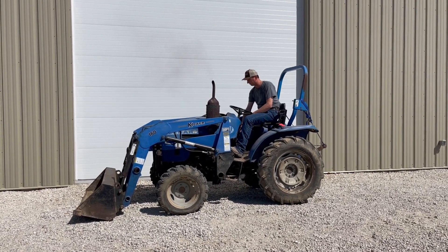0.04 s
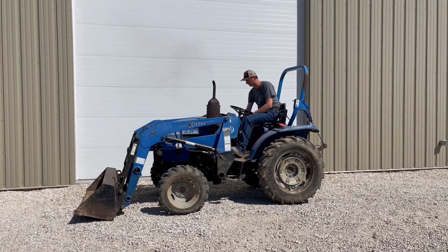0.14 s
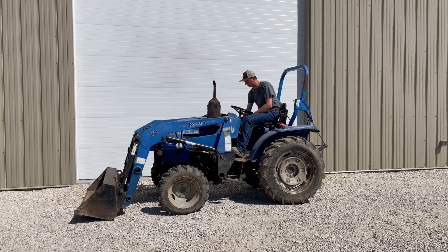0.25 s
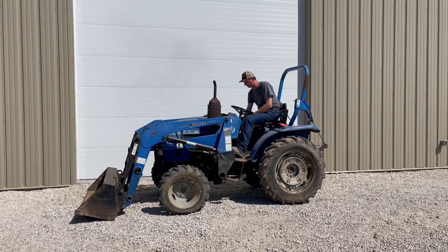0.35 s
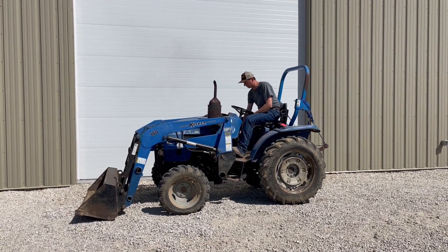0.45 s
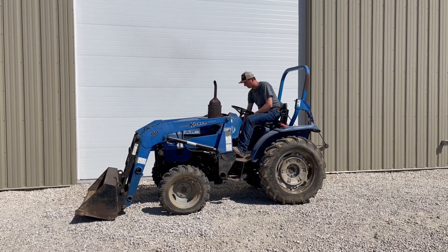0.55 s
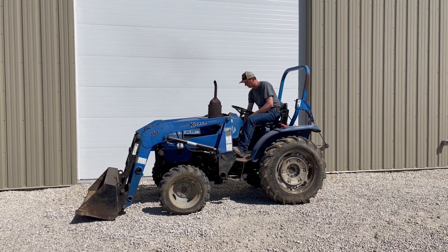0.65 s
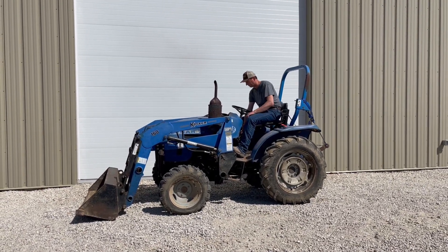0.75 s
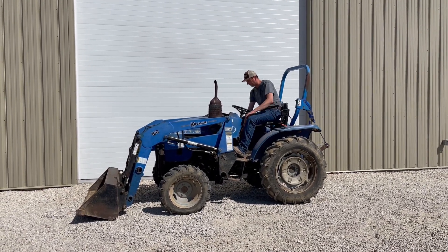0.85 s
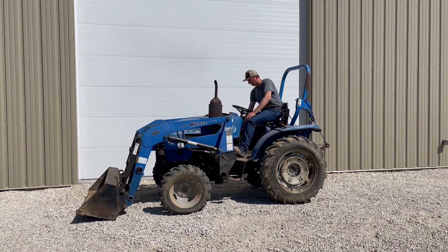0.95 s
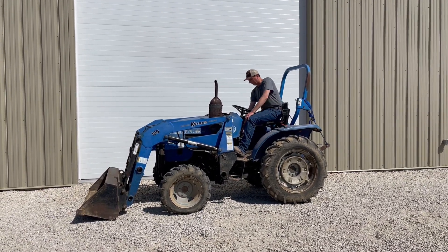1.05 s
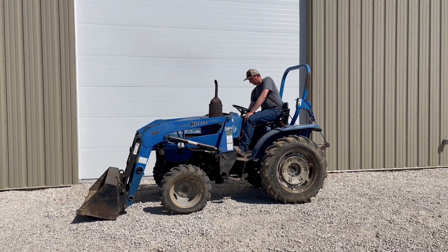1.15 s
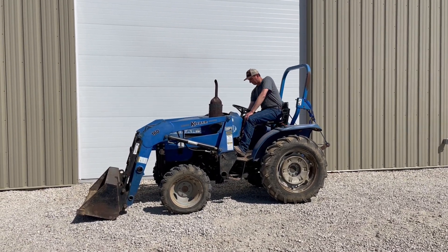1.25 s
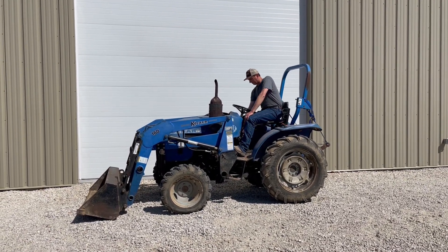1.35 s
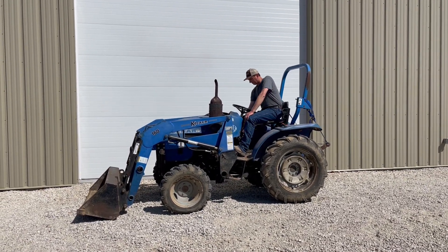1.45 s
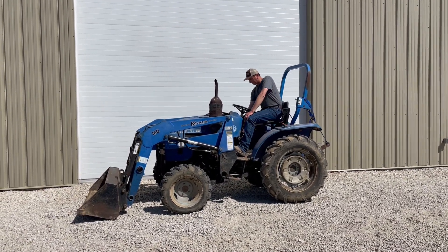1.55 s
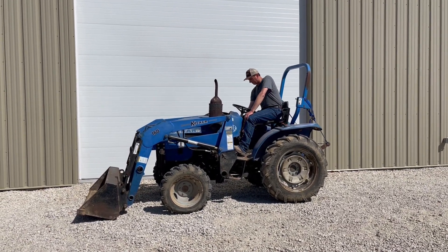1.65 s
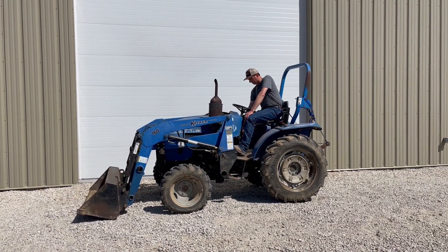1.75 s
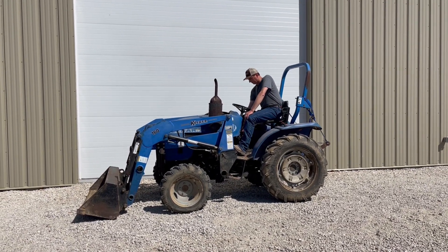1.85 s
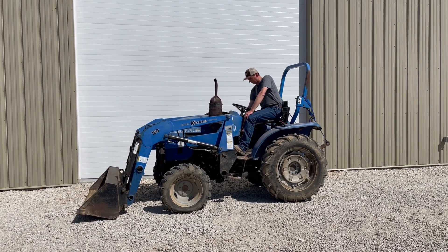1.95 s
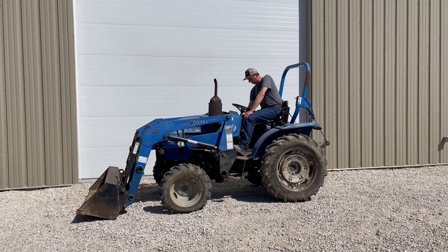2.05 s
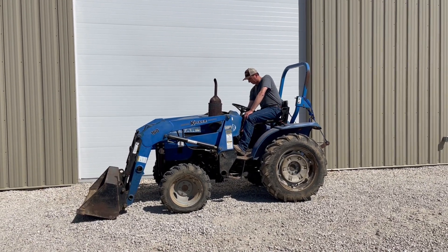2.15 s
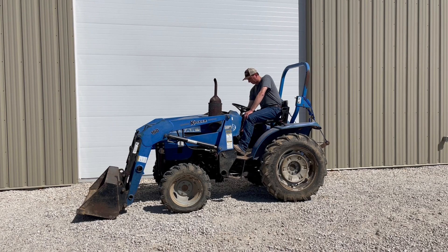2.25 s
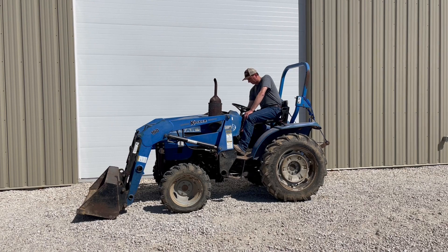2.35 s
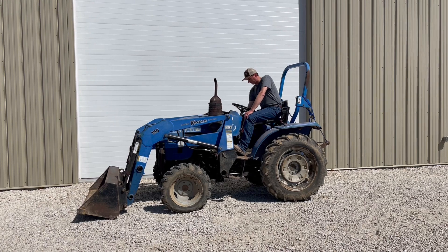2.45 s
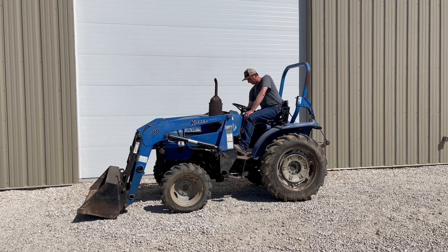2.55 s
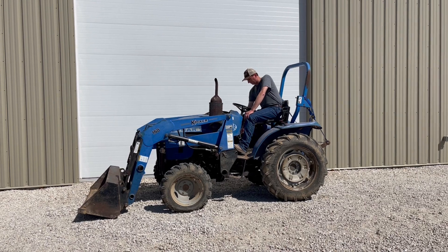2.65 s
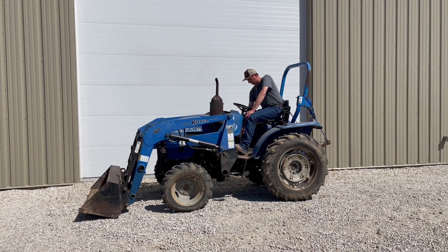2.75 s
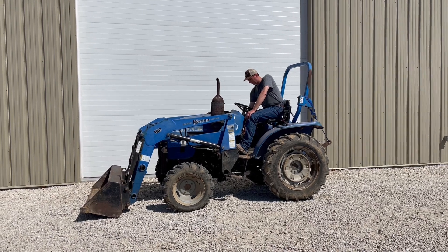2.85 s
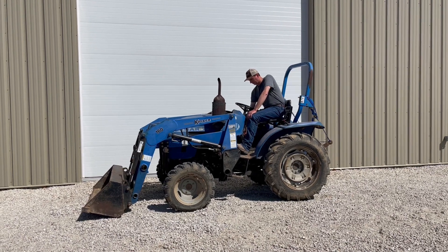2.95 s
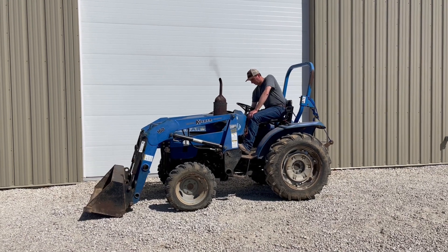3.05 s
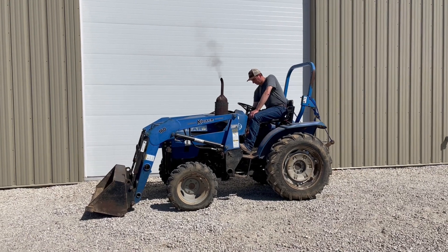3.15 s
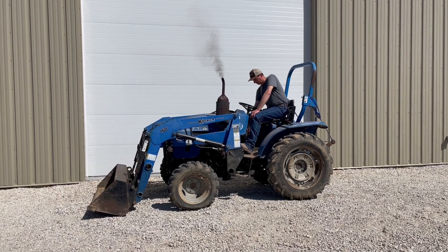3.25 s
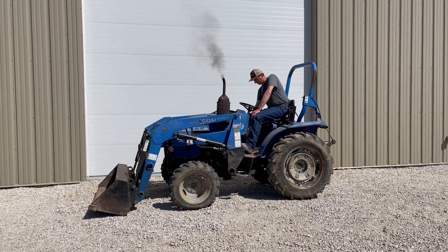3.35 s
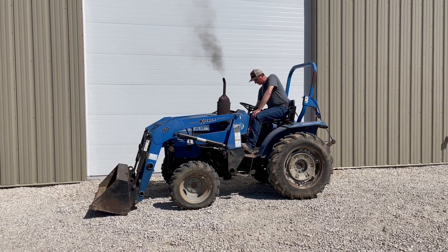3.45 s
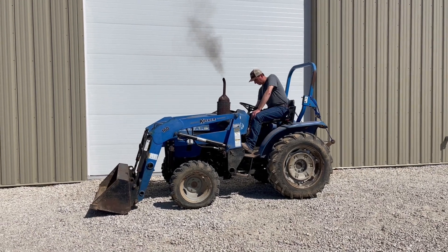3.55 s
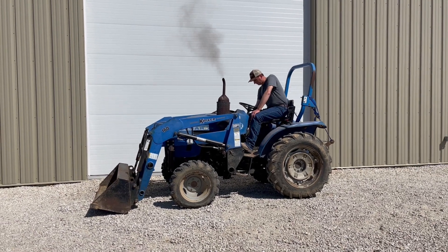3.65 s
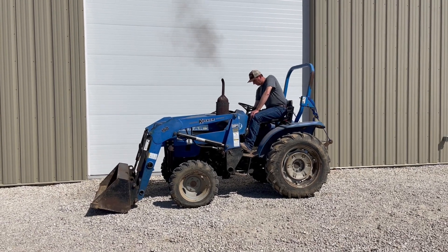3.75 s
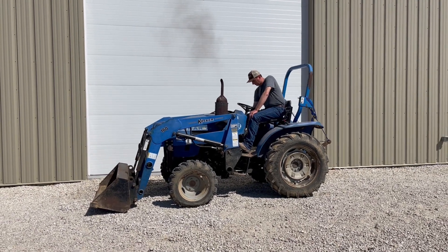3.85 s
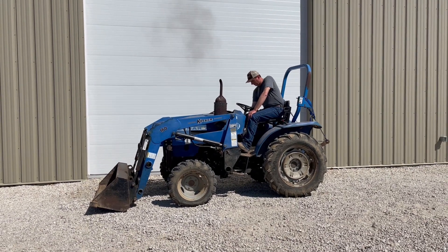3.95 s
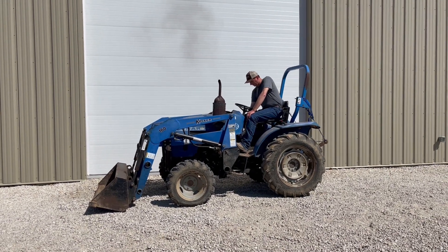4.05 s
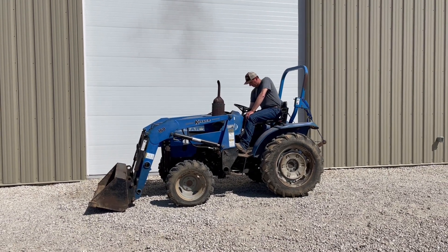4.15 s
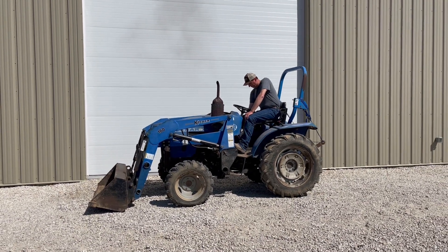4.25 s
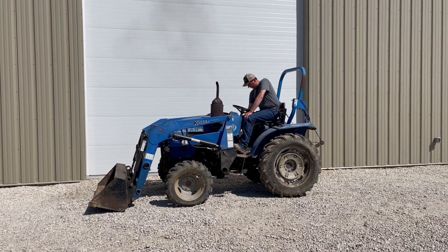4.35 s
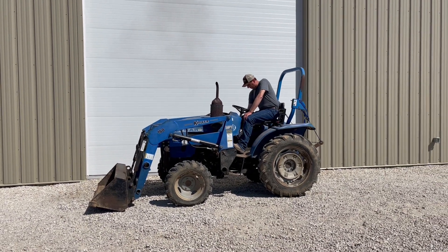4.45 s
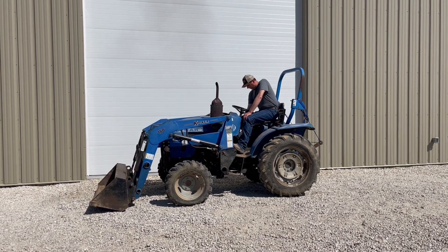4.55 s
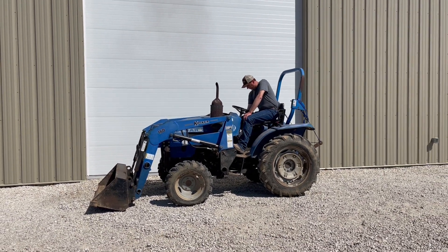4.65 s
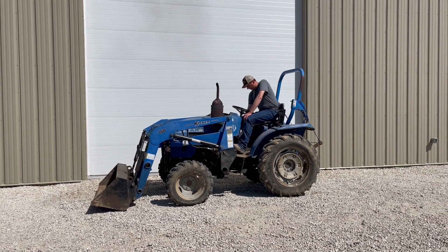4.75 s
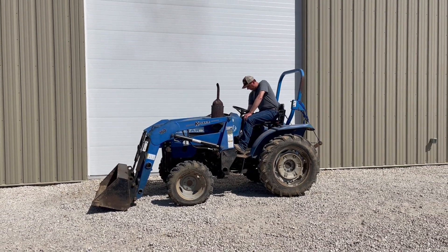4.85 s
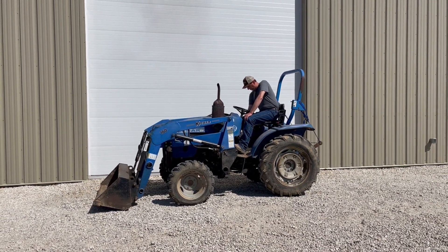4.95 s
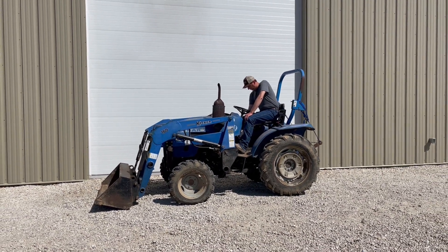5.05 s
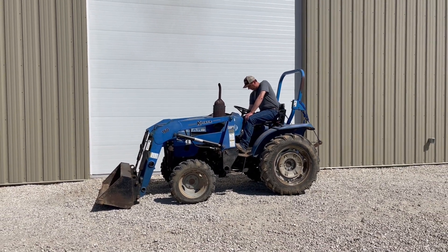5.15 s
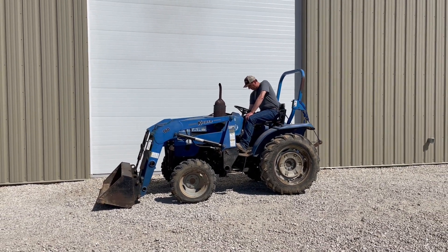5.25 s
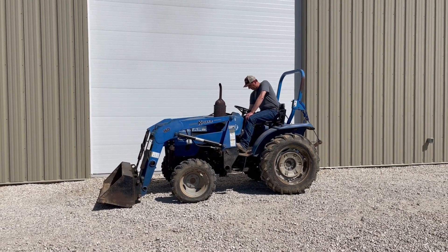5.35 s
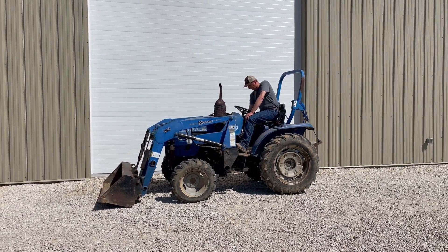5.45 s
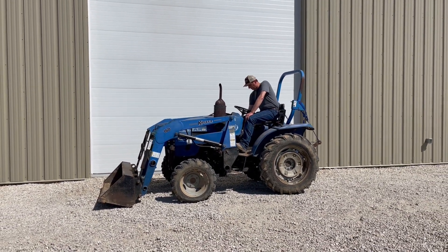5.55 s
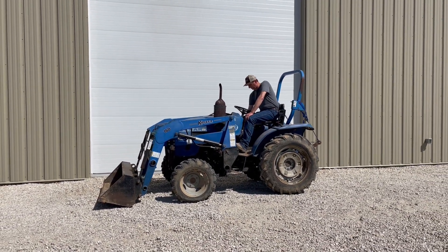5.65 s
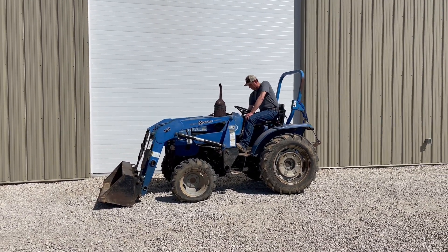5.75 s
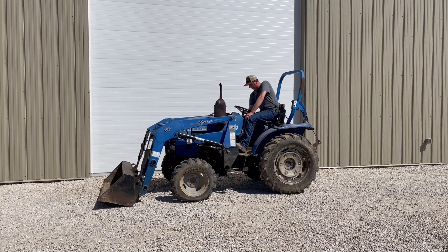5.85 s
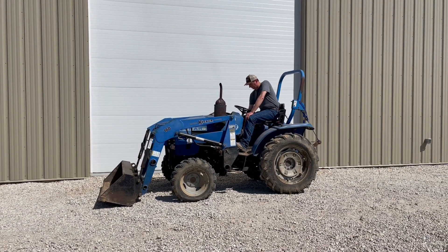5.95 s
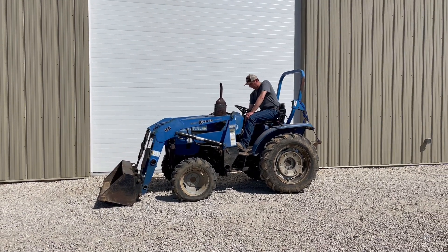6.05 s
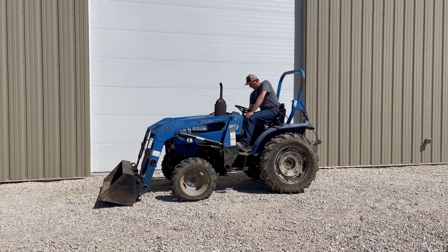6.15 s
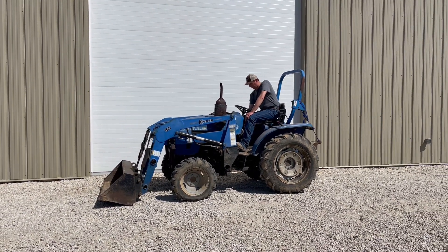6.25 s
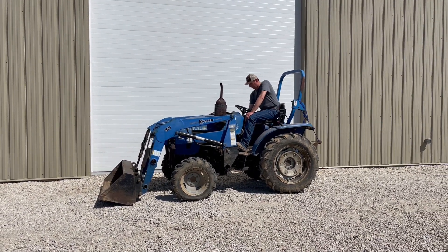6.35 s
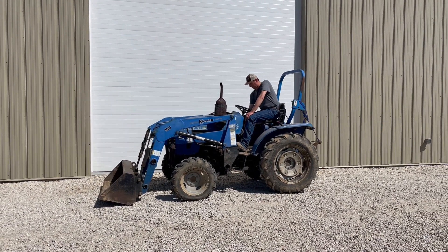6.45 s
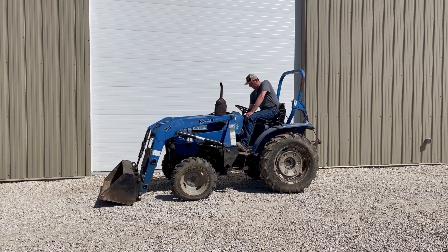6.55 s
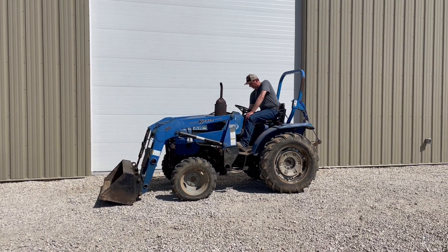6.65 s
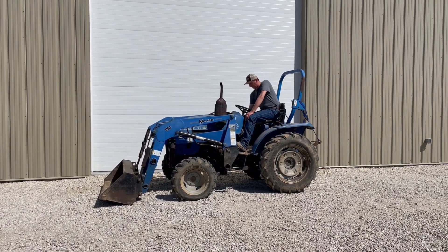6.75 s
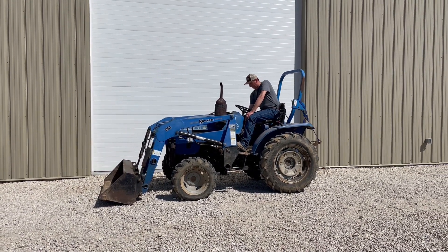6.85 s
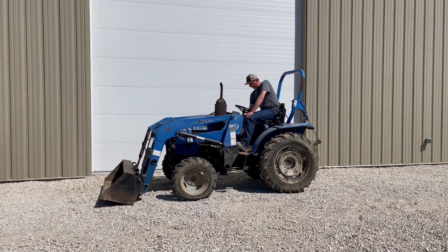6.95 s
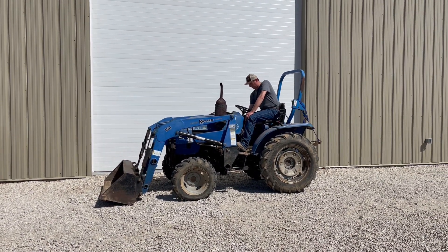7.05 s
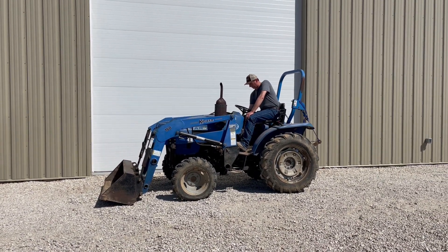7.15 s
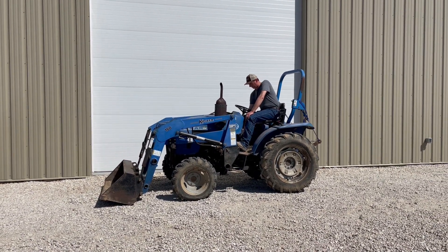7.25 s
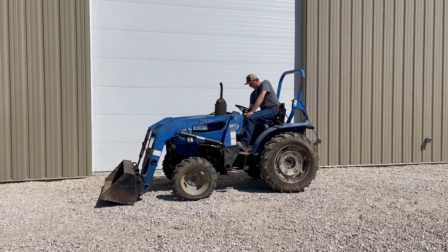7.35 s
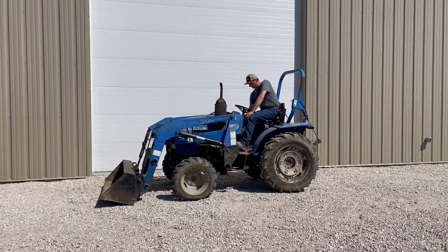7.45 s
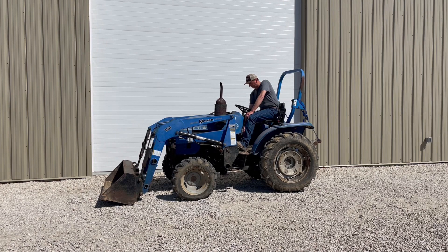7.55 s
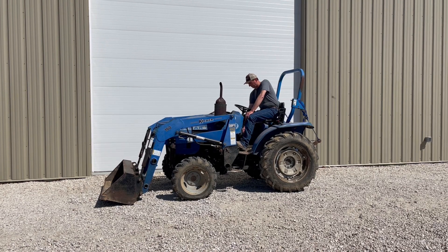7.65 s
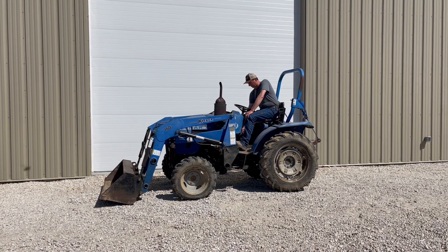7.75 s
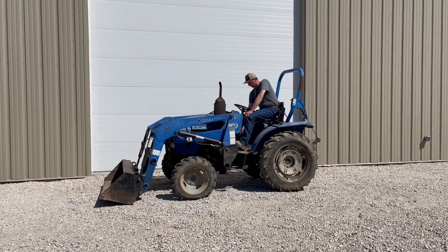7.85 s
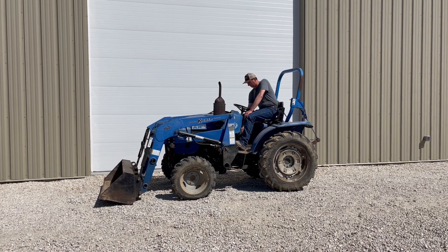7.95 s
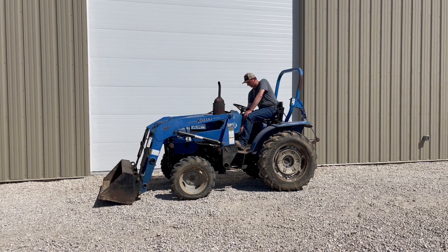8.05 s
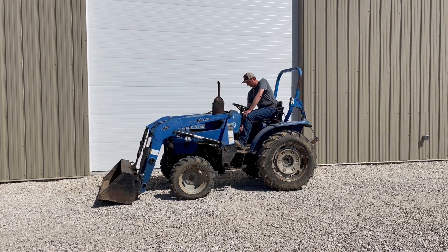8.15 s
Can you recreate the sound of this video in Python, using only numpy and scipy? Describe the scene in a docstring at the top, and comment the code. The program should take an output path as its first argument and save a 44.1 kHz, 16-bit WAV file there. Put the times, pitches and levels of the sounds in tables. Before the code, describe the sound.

Outdoor stereo sound of a compact tractor engine beside a ribbed steel building. First a quiet clattery diesel idle with dry knocks, loose cover rattle and sharp injector ticks. Then a quick rev with sputtering gas bursts to a faster chug, a second pull into a deep loud drone, and a smaller third rise to a fast hum, held to the end. Knocks blur together as whine and air rush grow.

```python
"""A compact tractor's three-cylinder diesel idles on gravel by a steel shed: muffler puffs, knocks, ticking injectors.
Each firing rings muffler and tailpipe and knocks on the block; covers rattle and valve gear clatters in between.
The first of three throttle pulls makes the exhaust spit in bright bursts of noise; each pull settles at a held speed.
With speed, gear whine climbs in step with the crank and a rush of gas and fan air covers the injector ticks.
Throughout, the shed wall and gravel scatter the treble back to a pair of close microphone ports."""
import sys
import numpy as np
from scipy import signal
from scipy.fft import rfft, irfft, next_fast_len
from scipy.io import wavfile
from scipy.ndimage import uniform_filter1d

SR = 44100
rng = np.random.default_rng(int(sys.argv[2]) if len(sys.argv) > 2 else 0)


def wrap_up_sound(samples):
    """Save the sound to the file named by the first command line argument, as 16-bit audio."""
    columns = np.atleast_2d(samples).T
    # keep every value between -1 and 1, then stretch to whole-number steps
    tamed = np.clip(columns, -1, 1)
    steps = np.round(tamed * 32767).astype(np.int16)
    wavfile.write(sys.argv[1], SR, steps)


N = 361619

# Engine speed: idle, then three pulls on the throttle. Each row: time in seconds, speed in firings per second.
ENGINE_SPEED = [(0, 15.231), (.554, 15.0), (2.18, 15.028), (2.669, 15.366), (3.282, 27.754),
                (3.835, 27.294), (4.508, 38.453), (4.754, 40.895), (5.586, 41.016), (6.002, 47.867),
                (6.387, 48.702), (7.082, 47.569), (8.2, 47.808)]
# The four held speeds, in firings per second.
HELD_SPEEDS = (15, 27, 41, 48)
# Level of each part by speed. Each row: speed in firings per second, then muffler boom, pipe bark,
# shell drone, block and hiss in dB.
PART_LEVELS = [(15.3, -28, -32.5, -39.5, -36, -48.5), (28, -27, -22.5, -33.5, -28.5, -41.5),
               (40.4, -19.5, -19.5, -30, -22.5, -38), (45, -22.5, -21.5, -33, -22, -36.5)]
# What full fuel adds to each part. Each row: speed in firings per second, then muffler boom, pipe bark,
# shell drone, block and hiss in dB.
FULL_FUEL_BOOST = [(15, 7, -0.5, -0.2, 1.9, -1), (33, 7.5, -1, -1.5, 1.5, 7.5),
                   (48.3, 3, 1.5, 3.5, 1.5, 5.5)]
# The governor gives full fuel at this acceleration (firings per s, per s); fuel lags and is smoothed.
FULL_FUEL_ACCELERATION, FUEL_LAG_S, FUEL_SMOOTHING_S = 24.3, 0.042, 0.14

# Exhaust puff of each cylinder. Each row: crank position in firings, boom in dB, bark at idle in dB,
# bark at full speed in dB.
CYLINDER_PUFFS = [(-.57, 0, 0, -4), (.43, -.6, -7.5, -5), (1.43, -1.2, -8.5, 0)]
# Sine throb at the firing rate. Each row: speed in firings per second, rms level in dB ahead of the yard.
FIRING_THROB = [(15, -82), (27, -59), (41, -37), (48, -33.5)]
# Responses of muffler, tailpipe and muffler shell. Each row: frequency in Hz, gain in dB.
MUFFLER_RESPONSE = [(25, -52), (45, 10.5), (60, 23.5), (77, 24.5), (92, 25.5), (107, 1.5), (125, 20.5),
                    (170, -21), (400, -33)]
PIPE_RESPONSE = [(60, -60.5), (110, -6), (128, -4), (146, -5), (165, 1), (190, -5.5), (207, 0), (245, -5.5),
                 (287, -1), (325, -17.5), (450, -31.5), (1200, -87)]
SHELL_RESPONSE = [(200, -35), (340, -7), (450, -7), (520, -8), (620, 0.5), (760, -8.5), (900, -6.5),
                  (1100, -7.5), (2000, -40)]
# Sharp resonances of tailpipe and silencer, which sing when a firing harmonic passes.
# Each row: frequency in Hz, width in Hz, gain in dB.
PIPE_RESONANCES = [(167.6, 1.6, -21), (210.5, 1.4, -1), (284.46, 17.3, 3.5), (216.3, 13, -5)]
SHELL_RESONANCES = [(384.7, 2.5, -2.5), (410, 3.4, -0.5), (470.3, 3.6, 3.5), (582, 4.2, 3), (626, 14, 1),
                    (658, 5.3, 1), (741.3, 19, 1)]

# Combustion knocks and piston slaps in one engine cycle. Each row: crank position at idle in firings,
# position at full speed in firings, scatter in dB, then relative level in dB at each of the four held speeds.
KNOCKS_AND_SLAPS = [(-.16, -.28, 1, .5, 1.5, 0, -1), (-.1, -.16, 1, -14, -16, -11, -4),
                    (-.07, -.04, 1, -1.5, -.5, -2.5, -1), (.3, .3, 1.5, -14, -14, -15, -10),
                    (.845, .76, 1.2, -6, -8.5, -7, -8), (.93, .88, 1.2, -6.5, -8.5, -5.5, 0),
                    (1.15, 1.2, 1.5, -20, -14, -8, -16), (1.835, 1.85, 1, -3.5, -6, -1, 0),
                    (1.945, 2.03, 1.2, -8.5, -9, -4.5, -9)]
# Firings that knock harder or softer than usual. Each row: time in seconds, level change in dB.
UNUSUAL_FIRINGS = [(.62, -6), (.885, -5), (.955, 2.5), (1.29, 3), (1.49, 2.5), (1.885, 4), (2.02, -4),
                   (2.485, -3), (2.615, 3), (2.745, 3), (3.045, -3), (3.17, 3), (3.21, 3.5), (3.283, 1.5),
                   (3.32, 2.5), (3.39, 1), (3.935, .5), (4.036, 2), (3.572, 5.5), (3.61, -4), (3.72, 2),
                   (3.83, 2), (4.223, 2), (4.308, -3), (5.265, 1.5), (5.725, 1.5), (7.475, 2.5),
                   (7.572, 1.5), (7.658, 3.5), (7.865, 2.5), (8.182, 3)]
# Other firings scatter in strength (dB); each shares its blow among the modes anew (0-1).
BURN_SCATTER_DB, STROKE_VARIETY = .6, .3
# A knock spreads through the iron, cracks, and leaves the castings ringing over a dense tail.
KNOCK_SPREAD_S, CRACK_T60_S, RING_DB = .0008, .023, 1
CRACK_HZ, CRACK_WIDTH_HZ = 2200, 2300
TAIL_HZ, TAIL_WIDTH_HZ, TAIL_T60_S, TAIL_DB = 2000, 3000, .28, -4.5
# Ringing castings and covers. Each row: frequency in Hz, width in Hz, gain at idle in dB, gain at speed in dB,
# both ahead of RING_DB.
CASTING_MODES = [(1258, 35, -4, 8), (1340, 35, 4, -6), (1455, 40, 9, 2), (1560, 45, 1, 5), (1760, 40, 0, 3),
                 (1955, 50, -8, 5), (2100, 30, 8, 2), (2172, 30, 1, 3), (2305, 60, 3, 4), (2465, 45, 0, 8),
                 (2620, 50, 4, -4), (2745, 45, 8, 1), (2944, 35, -8, 9), (3330, 80, 3, 1),
                 (4210, 100, 7, 8), (6600, 130, 3, 7)]
# Loose covers rattle after each knock.
RATTLE_PER_S, RATTLE_SCATTER_DB, RATTLE_RISE_S, RATTLE_T60_S = 190, 1.5, .003, .24
RATTLE_HZ, RATTLE_WIDTH_HZ, RATTLE_RING_T60_S, RATTLE_DB = 2400, 1100, .02, 2.5
# Clatter between the knocks. Each row: speed in firings per second, relative level in dB.
CLATTER_LEVEL = [(15, -7.5), (27, -5), (41, -6), (48, -7.5)]
# Tone of the whole block. Each row: frequency in Hz, gain in dB.
BLOCK_RESPONSE = [(150, -33), (290, 0.5), (400, 2), (650, 4.5), (1000, -3.5), (1450, -4.5), (1850, -0.5),
                  (2150, -2.5), (2480, -2), (2800, -5), (3100, -6.5), (3500, -16), (3850, -17.5),
                  (4350, -15), (5400, -16), (8000, -27), (12500, -17)]

# Injector ticks. Each row: crank position in firings, relative level in dB, ring of the steel lines in dB.
INJECTOR_TICKS = [(-.16, 4, -4), (.22, 1.5, -4), (.34, 2.5, -4), (.845, 5, -4), (1.84, 7.5, 1),
                  (2.39, 0, -4)]
# Ringing injector lines. Each row: frequency in Hz, width in Hz, gain in dB.
INJECTOR_LINES = [(4050, 34, -29), (5440, 57, 15.5), (6100, 370, 13.5), (6800, 160, 20), (7470, 160, 15),
                  (9200, 770, 11), (11270, 260, 2)]
TICK_RISE_S, TICK_T60_S = .0009, .13
# Tone of ticks and rushing air. Each row: frequency in Hz, gain in dB.
HISS_RESPONSE = [(1500, -6.5), (3200, 13.5), (3850, 14), (4400, 12.5), (5400, 8), (6600, 3.5), (7200, 2.5),
                 (8500, 7), (11600, 6), (13000, -51)]

# Whine of timing gears and pump drive. Each row: tooth meshes per firing, level at top speed in dB
# ahead of GEAR_DB, growth in dB per doubling of speed.
GEAR_WHINES = [(18.67, -43.5, 19), (23.75, -46, 30), (26.33, -46, 30), (52, -40, 30), (87.42, -52, 30)]
GEAR_DB, GEAR_ROUGHNESS, FLUTTER_HZ_PER_MESH = 4, .7, .6

# Exhaust spits. Each row: start in seconds, level in dB ahead of the rise and fall of its envelope.
EXHAUST_SPITS = [(2.785, -29.5), (2.841, -27), (2.941, -22.5), (2.989, -21), (3.036, -27), (3.076, -19.5),
                 (3.119, -23), (3.161, -27), (3.197, -25), (3.236, -33)]
# Lower and upper edge of the spits' band, in Hz.
SPIT_EDGES_HZ = (710, 12200)
SPIT_GRIT_DB, SPIT_GRAIN_S = 3.2, .0012

# Microphone ports. Each row: frequency in Hz, left minus right in dB, phase by which left leads in radians.
PORT_DIFFERENCES = [(60, -2.2, -0.24), (200, -3, -0.12), (600, -3, -0.15), (1250, -3.7, -0.062),
                    (1810, -3.5, -0.9), (2190, -4, 0.7), (2570, -2.2, 0.72), (2870, 0, 1.59),
                    (4540, 2.2, 0.84), (5500, 0.6, 1.03), (7300, 3.5, 1.2), (8200, 0.1, -0.5),
                    (9830, 0, -2.7), (11300, 0, .75)]


def exhaust(crank, speed, boom_db, bark_db, drone_db):
    """Puffs ring the muffler, the tailpipe and the muffler's shell; turbulence rides on each."""
    position, cylinder_db, idle_db, fast_db = np.transpose(CYLINDER_PUFFS)
    puffs = np.array([strikes(crank, p, scatter_db=.6, jitter_s=.00004) for p in position])
    gas = even(rng.standard_normal(N) * swell(crank, position=0.15, sharpness=0.24), crank)
    # off idle the rising piston pushes out a second puff, half a firing after the blowdown
    push = even(sum(strikes(crank, p + .5, scatter_db=1.5, jitter_s=.00004) for p in position), crank)

    boom = even(from_db(cylinder_db) @ puffs, crank)
    boom = boom + np.interp(speed, [16, 25, 41], [0, .6, .45]) * push
    gas_in_muffler = from_db(np.interp(speed, [15, 41], [-13, -16])) * gas

    # the loudest bark passes from the first cylinder at idle to the third at full speed
    shift = np.interp(speed, [16, 27, 43, 48], [0, .45, .6, 1])
    puff_db = idle_db[:, None] + np.outer(fast_db - idle_db, shift)
    bark = even((from_db(puff_db) * puffs).sum(0), crank)
    bark = bark + np.interp(speed, [20, 27, 34], [0, .6, .1]) * push
    # slow puffs are blunter, so the pipe is duller at idle
    blunt = signal.sosfilt(signal.butter(2, 175, fs=SR, output="sos"), bark)
    sharp = signal.sosfilt(signal.butter(2, 420, fs=SR, output="sos"), bark)
    bark = blunt + np.interp(speed, [27, 42], [0, 1]) * (sharp - blunt)
    gas_in_pipe = from_db(np.interp(speed, [15, 27], [-11, -13])) * gas

    pipe = colour(bark + gas_in_pipe, PIPE_RESPONSE)
    pipe += from_db(-2.5) * modes(bark, PIPE_RESONANCES)
    # at idle the pipe's first resonance dominates
    first_resonance = resonance(pipe, hz=164, width_hz=36)
    pipe += np.interp(speed, [16, 22], [.95, 0]) * (first_resonance - pipe)
    muffler = colour(boom + gas_in_muffler, MUFFLER_RESPONSE)
    out = from_db(boom_db) * even(muffler, crank) + from_db(bark_db) * even(pipe, crank)
    # the chambers hold each puff back and round its attack (an all-pass)
    out = out - 2 * resonance(out, hz=76.0, width_hz=110)

    singing = even(modes(puffs.sum(0), SHELL_RESONANCES), crank)
    singing = singing * from_db(np.interp(speed, [15, 40], [-5, 4]))
    shell_gas = even(colour(gas, SHELL_RESPONSE), crank)
    out += from_db(drone_db) * even(singing + shell_gas, crank)
    throb = np.sqrt(2) * np.cos(2 * np.pi * (crank - .15))
    return out + from_db(at_hz(FIRING_THROB, speed)) * throb


def block(crank, speed):
    """Knocks crack, ring the castings in a new mix and rattle the covers; valve gear clatters between."""
    trains = knock_clicks(crank, speed)
    clatter_db, = by_speed(CLATTER_LEVEL, speed)
    clatter = from_db(clatter_db) * (valve_gear(crank) + from_db(-6) * rng.standard_normal(N))
    chatter = rattle(trains) * from_db(np.interp(speed, [15, 44], [0, -7]))
    out = clatter + from_db(RATTLE_DB) * resonance(chatter, RATTLE_HZ, RATTLE_WIDTH_HZ)
    for clicks in trains:
        iron, stray = crack(), crack()
        iron = iron + from_db(TAIL_DB) * resonance(dying_noise(TAIL_T60_S), TAIL_HZ, TAIL_WIDTH_HZ)
        varied_clicks = clicks * rng.standard_normal(N)
        out = out + signal.oaconvolve(clicks, iron)[:N]
        out = out + signal.oaconvolve(varied_clicks, STROKE_VARIETY * stray)[:N]
    throttle = np.interp(speed, [15, 44], [0, 1])
    for hz, width_hz, idle_db, fast_db in CASTING_MODES:
        blows = rng.choice([-1., 1.], len(trains)) @ trains
        blows = blows + STROKE_VARIETY * rng.standard_normal(N) * trains.sum(0)
        ring = resonance(blows + clatter + chatter / 2, hz, width_hz)
        out = out + from_db(RING_DB + idle_db + throttle * (fast_db - idle_db)) * ring
    out = colour(out, BLOCK_RESPONSE)
    return out / out.std()


def knock_clicks(crank, speed):
    """One click train per knock, of mean power 1 together; no two firings burn alike."""
    firing = np.round(crank).astype(int)
    burn_db = BURN_SCATTER_DB * rng.standard_normal(firing[-1] + 1)
    for s, db in UNUSUAL_FIRINGS:
        burn_db[firing[int(s * SR)]] = db
    # share of the way from the idle position to the full-speed position
    advance = np.interp(speed, HELD_SPEEDS, [0, .25, .7, 1])
    trains, power = [], 0
    for idle_at, fast_at, scatter_db, *step_db in KNOCKS_AND_SLAPS:
        gain = from_db(np.interp(speed, HELD_SPEEDS, step_db))
        shifted_crank = crank + (idle_at - fast_at) * advance
        trains.append(gain * strikes(shifted_crank, idle_at, scatter_db, jitter_s=.00003))
        power = power + gain ** 2 * speed / (3 * SR)
    return np.array(trains) * from_db(burn_db[firing]) / np.sqrt(power)


def crack():
    """A short noise burst, rounded by its spread through the iron and centred on the crack's band."""
    return resonance(rounded(dying_noise(CRACK_T60_S), KNOCK_SPREAD_S), CRACK_HZ, CRACK_WIDTH_HZ)


def rattle(trains):
    """Each knock shakes loose covers, which chatter in uneven taps until the shaking dies away."""
    age = np.arange(SR // 2) / SR
    shake = ((1 - np.exp(-age / RATTLE_RISE_S)) * from_db(-60 * age / RATTLE_T60_S)) ** 2
    shaking_power = signal.oaconvolve((trains ** 2).sum(0), shake / shake.sum())[:N]
    shaking = np.sqrt(np.abs(shaking_power))
    gaps = rng.uniform(.4, 1.6, int(2 * RATTLE_PER_S * N / SR)) * SR / RATTLE_PER_S
    at = np.cumsum(gaps).astype(int)
    at = at[at < N]
    taps = np.bincount(at, from_db(RATTLE_SCATTER_DB * rng.standard_normal(len(at))), N)
    decay = from_db(-60 / (RATTLE_RING_T60_S * SR))
    buzz = signal.lfilter([1], [1, -decay], taps) * rng.standard_normal(N)
    return shaking * buzz / buzz.std()


def valve_gear(crank, count=72):
    """Many small contacts, each at its own crank position, repeat cycle after cycle."""
    positions = (np.arange(count) + rng.random(count)) * 3 / count
    signs = rng.choice([-1, 1], count)
    clicks = sum(sign * strikes(crank, p, scatter_db=2, jitter_s=.00002)
                 for p, sign in zip(positions, signs))
    return even(signal.oaconvolve(clicks, dying_noise(t60=0.014))[:N], crank)


def hiss(crank, speed):
    """Injectors tick and ring their steel lines at idle; at speed the rush of gas and fan air takes over."""
    ticks = 0
    for position, db, ring_db in INJECTOR_TICKS:
        clicks = from_db(db) * strikes(crank, position, scatter_db=1.5, jitter_s=.0002)
        tick = rounded(dying_noise(TICK_T60_S), TICK_RISE_S)
        ringing_tick = tick + from_db(ring_db) * modes(tick, INJECTOR_LINES)
        ticks = ticks + signal.oaconvolve(clicks, ringing_tick)[:N]
    rush = even(rng.standard_normal(N) * swell(crank, position=0.39, sharpness=0.49), crank)
    tick_gain = from_db(np.interp(speed, [15, 30], [5, -8]))
    return even(colour(rush + tick_gain * even(ticks, crank), HISS_RESPONSE), crank)


def gears(crank, speed):
    """Meshing teeth whine in step with the crank, fluttering a little and growing with speed."""
    out = 0
    for meshes, db, db_per_doubling in GEAR_WHINES:
        slow = signal.butter(2, FLUTTER_HZ_PER_MESH * meshes, fs=SR, output="sos")
        # complex noise wavers both strength and phase
        flutter = signal.sosfilt(slow, rng.standard_normal(N) + 1j * rng.standard_normal(N))
        waver = 1 + GEAR_ROUGHNESS * flutter / flutter.std()
        tone = (waver * np.exp(2j * np.pi * meshes * crank)).real
        level_db = db + db_per_doubling * np.log2(speed / speed.max())
        out = out + from_db(level_db) * tone / tone.std()
    return out * from_db(GEAR_DB)


def spits(rise_s, fall_s):
    """Short bright jets of gas: band-passed noise, sputtering at random, under quick envelopes."""
    gate = 0
    for s, db in EXHAUST_SPITS:
        age = np.arange(N) / SR - s
        gate = gate + from_db(db) * np.clip(age / rise_s, 0, 1) * np.exp(-np.abs(age) / fall_s)
    band = signal.butter(2, SPIT_EDGES_HZ, "band", fs=SR, output="sos")
    jet = signal.sosfilt(band, rng.standard_normal(N))
    grit = uniform_filter1d(rng.standard_normal(N), int(SPIT_GRAIN_S * SR))
    jet = jet * from_db(SPIT_GRIT_DB * grit / grit.std())
    return gate * jet / jet.std()


def yard(x):
    """The ribbed shed wall and the gravel scatter the treble back, differently to each port."""
    bright = signal.sosfilt(signal.butter(2, 2000, "high", fs=SR, output="sos"), x)
    late = np.interp(np.arange(N) - 0.026 * SR, np.arange(N), bright, left=0)
    scatter = np.array([signal.oaconvolve(late, dying_noise(t60=.15))[:N] for port in range(2)])
    return x + from_db(-13.5) * scatter


def fuel(speed):
    """Share of full fuel: the governor opens as the engine gathers speed and eases off as it sinks."""
    demand = np.clip(np.gradient(speed) * SR / FULL_FUEL_ACCELERATION, -1, 1)
    late = np.interp(np.arange(N) - FUEL_LAG_S * SR, np.arange(N), demand)
    return uniform_filter1d(late, max(1, int(FUEL_SMOOTHING_S * SR)))


def strikes(crank, position, scatter_db, jitter_s):
    """One click per engine cycle at a crank position, a little uneven in strength and time."""
    turns = position + 3 * np.arange(-1, 110)
    chance = rng.standard_normal((len(turns), 2))
    at = np.interp(turns, crank, np.arange(N), left=-SR, right=2 * N)
    at = at + jitter_s * SR * chance[:, 0]
    heard = (at >= 0) & (at < N)
    return np.bincount(at[heard].astype(int), from_db(scatter_db * chance[heard, 1]), N)


def swell(crank, position, sharpness):
    """A smooth bump once per firing."""
    return np.exp(sharpness * (np.cos(2 * np.pi * (crank - position)) - 1))


def even(x, crank):
    """Bring the rms over each engine cycle of three firings to 1."""
    start, end = [np.interp(crank + side * 3 / 2, crank, np.arange(N)).astype(int) for side in (-1, 1)]
    energy = np.cumsum(x ** 2)
    return x / np.sqrt((energy[end] - energy[start]) / (end - start) + 1e-12)


def rounded(response, rise_s):
    """A blow takes a moment to build: soften the onset and keep unit energy."""
    response = response * (1 - np.exp(-np.arange(len(response)) / SR / rise_s))
    return response / np.linalg.norm(response)


def dying_noise(t60, size=8192):
    """Response of many dense modes, with unit energy."""
    tail = rng.standard_normal(size) * from_db(-60 * np.arange(size) / SR / t60)
    return tail / np.linalg.norm(tail)


def resonance(x, hz, width_hz):
    """Band-pass with gain 1 on top."""
    return signal.lfilter(*signal.iirpeak(hz, hz / width_hz, fs=SR), x)


def modes(x, table):
    """Resonances side by side, with alternating signs."""
    return sum((-1) ** k * from_db(db) * resonance(x, hz, width)
               for k, (hz, width, db) in enumerate(table))


def colour(x, points, size=16384):
    """Causal (minimum-phase) filter with the given response."""
    gain = from_db(at_hz(points, np.fft.rfftfreq(size, 1 / SR)))
    cepstrum = irfft(np.log(gain))
    # fold the cepstrum onto positive time
    cepstrum[1:size // 2] *= 2
    cepstrum[size // 2 + 1:] = 0
    return signal.oaconvolve(x, irfft(np.exp(rfft(cepstrum))))[:N]


def at_hz(points, hz):
    """Read a curve on a log-frequency axis."""
    f, value = np.transpose(points)
    return np.interp(np.log(hz + 1e-6), np.log(f), value)


def by_speed(rows, speed):
    """Each column of a table, read at the engine's speed."""
    rate, *columns = np.transpose(rows)
    return np.array([np.interp(speed, rate, c) for c in columns])


def in_time(rows):
    """Each column of a curve, at every sample."""
    s, *columns = np.transpose(rows)
    return [np.interp(np.arange(N) / SR, s, c) for c in columns]


def from_db(db):
    """Decibels to gain."""
    return 10 ** (np.asarray(db) / 20)


def scene():
    """The crank drives every part of the engine; speed and fuel set how loud its parts are."""
    speed, = in_time(ENGINE_SPEED)
    # crank position counted in firings
    crank = .479 + np.cumsum(speed) / SR
    levels = by_speed(PART_LEVELS, speed) + fuel(speed) * by_speed(FULL_FUEL_BOOST, speed)
    boom_db, bark_db, drone_db, block_db, hiss_db = levels
    engine = exhaust(crank, speed, boom_db, bark_db, drone_db)
    engine += from_db(block_db) * block(crank, speed)
    engine += from_db(hiss_db) * hiss(crank, speed)
    return yard(engine + gears(crank, speed) + spits(rise_s=0.0044, fall_s=0.01))


def record(dry):
    """The two ports differ in level and phase; their cavity cuts a notch, and the top is cut."""
    margin = 2048
    size = next_fast_len(N + 2 * margin)
    hz = np.fft.rfftfreq(size, 1 / SR)
    # each port takes half of the difference, with opposite sign
    half = np.array([[1], [-1]]) / 2
    port_hz, *columns = np.transpose(PORT_DIFFERENCES)
    balance_db, lead = [at_hz(np.c_[port_hz, c], hz) for c in columns]
    port_response = from_db(half * balance_db) * np.exp(1j * half * lead)
    padded = np.pad(dry, [(0, 0), (margin, margin)], mode="reflect")
    x = irfft(rfft(padded, size) * port_response, size)[:, margin:margin + N]
    for section in range(2):
        x = x - resonance(x, hz=10420, width_hz=650)
    return signal.sosfilt(signal.ellip(10, .2, 80, 12200, fs=SR, output="sos"), x)


dry = scene()
out = record(dry)
wrap_up_sound(out)
```